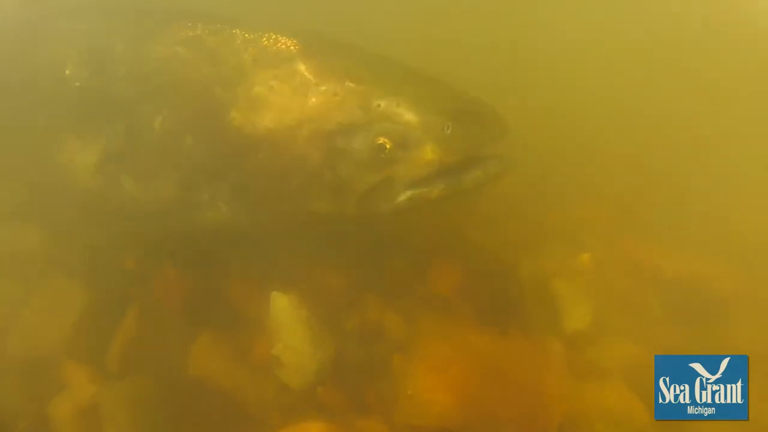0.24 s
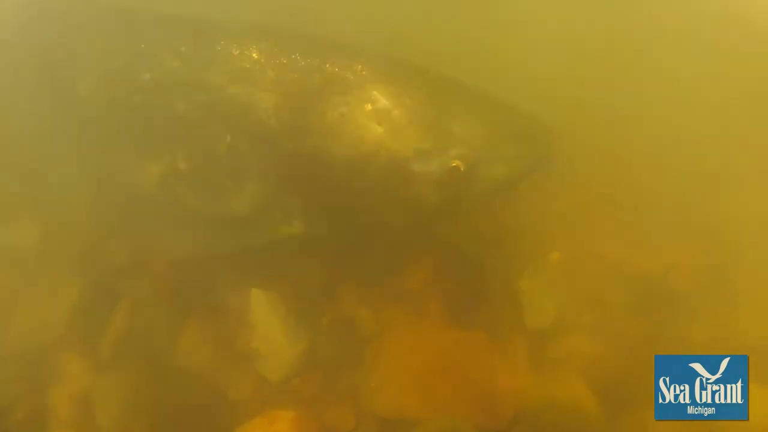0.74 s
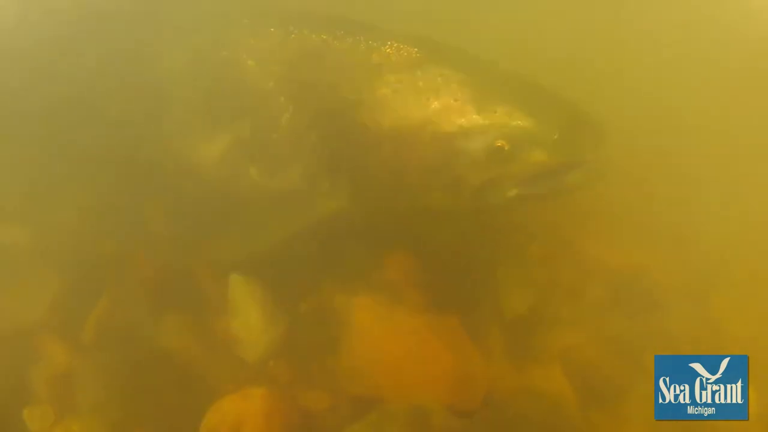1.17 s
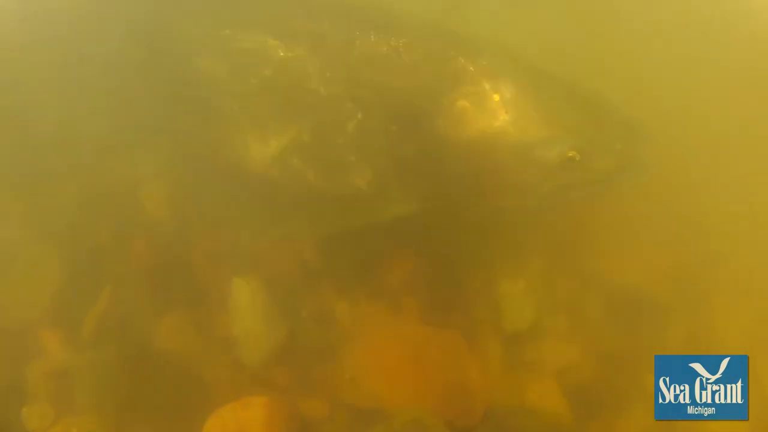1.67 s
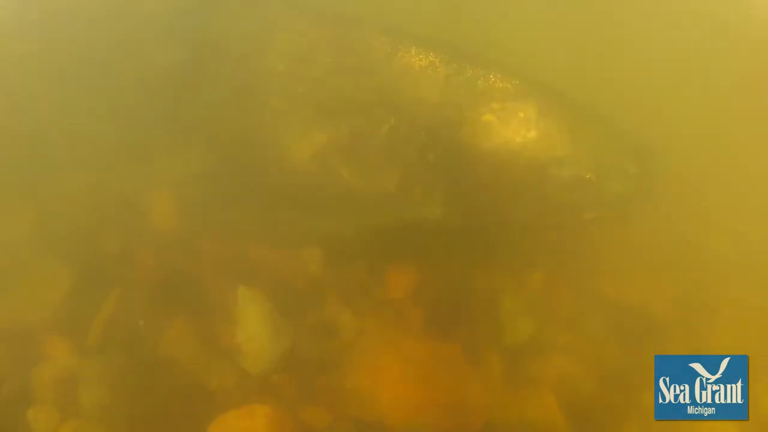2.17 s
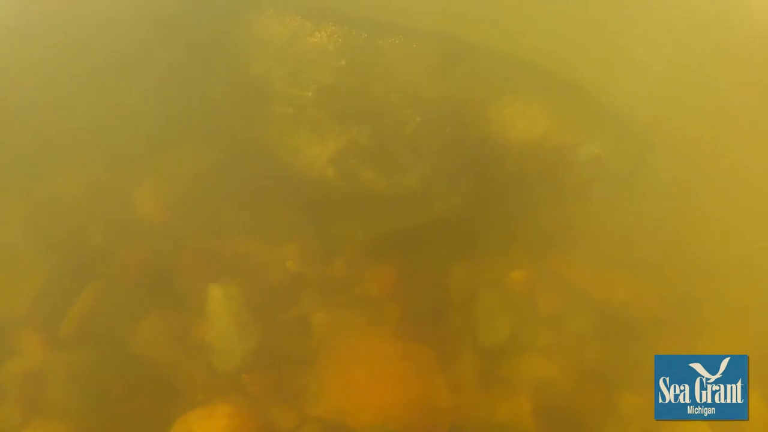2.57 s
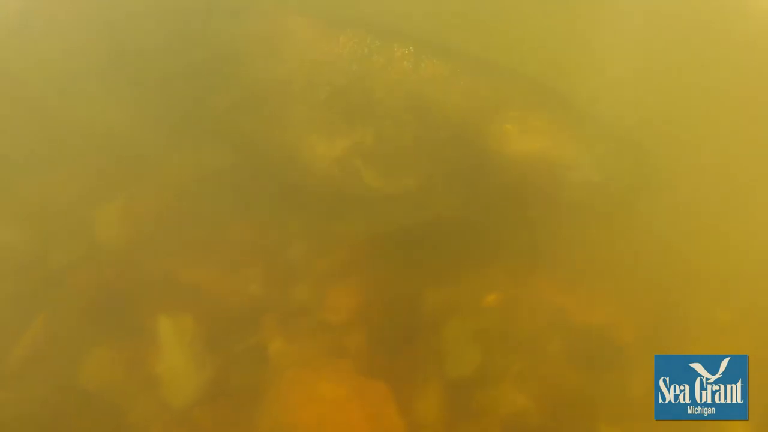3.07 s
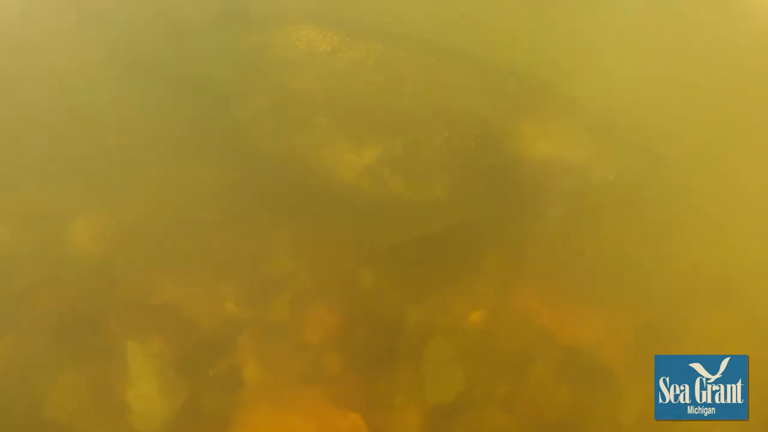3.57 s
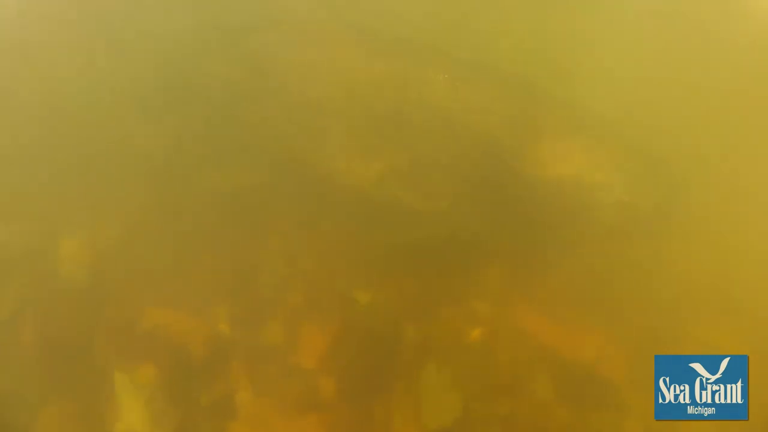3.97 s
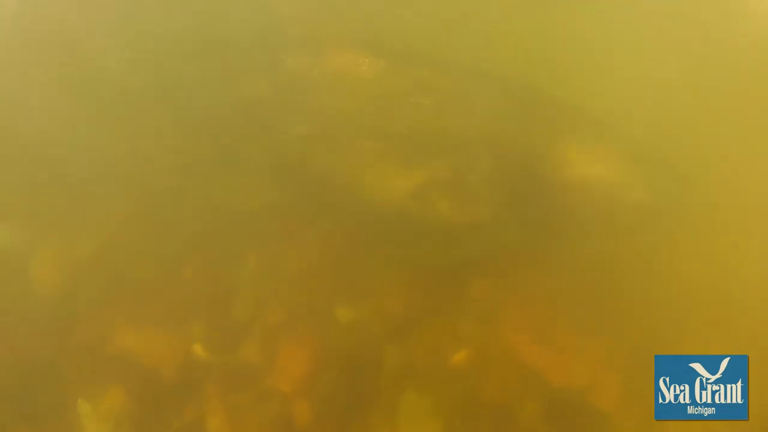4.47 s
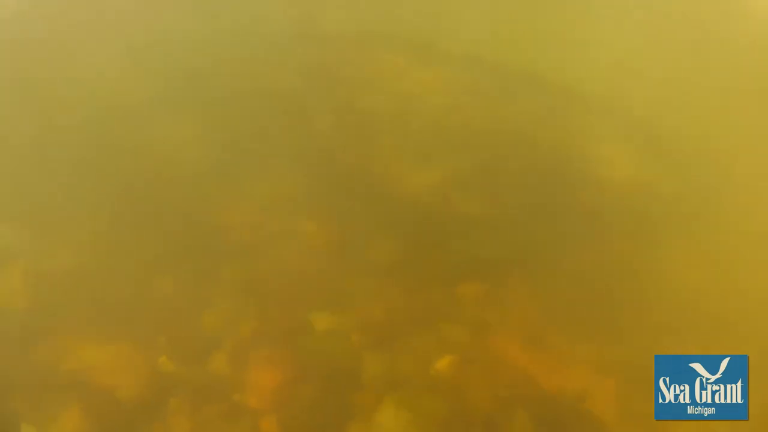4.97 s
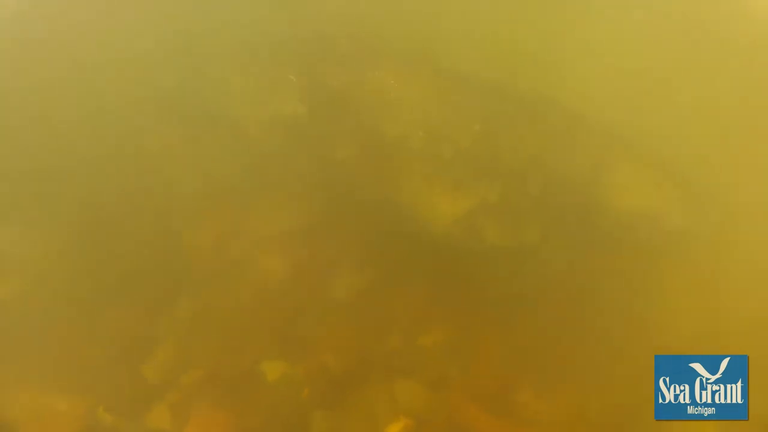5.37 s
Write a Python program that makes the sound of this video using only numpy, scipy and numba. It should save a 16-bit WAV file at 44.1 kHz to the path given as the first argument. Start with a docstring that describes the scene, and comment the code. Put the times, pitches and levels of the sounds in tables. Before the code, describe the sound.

A submerged microphone catches current buffeting its mount: deep rumbling, sandy scrapes, a hard thump midway, bubble blips, scraping thickest at the end.

```python
"""Low, restless rumble under gritty scraping, with knocks, watery pings and gulps: a sealed camera on a pole in a river.
The current drives noise through the low modes of the pole; scattered grains ring the shell and the lens port.
Knocks and the soft thumps of eddies are short pushes on these modes, bubbles are gliding, fading sines, the far river
is banded noise. The recorder samples slowly and holds each value, so the treble mirrors the middle."""
import sys
import numpy as np
from scipy import signal
from scipy.fft import rfft, irfft
from scipy.io import wavfile
from scipy.ndimage import uniform_filter1d
from numba import njit

SR = 44100
rng = np.random.default_rng(int(sys.argv[2]) if len(sys.argv) > 2 else 0)


def volts_from_decibels(level):
    """Turn decibel levels (scalar or array-like) into linear amplitude factors."""
    exponent = np.asarray(level, float) / 20
    return 10 ** exponent


def to_wav(sig):
    """Store sig (one row per channel, or 1-D mono) as 16-bit WAV at the path in sys.argv[1].

    Samples outside -1..1 are clipped; the rate is SR.
    """
    pcm = np.clip(np.atleast_2d(sig), -1, 1) * 32767
    pcm = np.round(pcm).astype(np.int16)
    wavfile.write(sys.argv[1], SR, pcm.T)  # frames by channels


N = 248724
TIME = np.arange(N) / SR

# Modes of the pole and its mount. Each row: pitch in Hz, width in Hz when driven steadily, relative level in dB.
POLE_MODES = [(26.2, 13.5, -3.5), (40.16, 10.6, 1), (61.3, 16, -10), (92, 11, -4.5), (141.7, 15.5, -14),
              (184, 12, -16.5), (245, 17.7, -15), (281, 45, -21.5)]


def level(x, db):
    """Scale to an rms level in dB."""
    return x * volts_from_decibels(db) / np.sqrt(np.mean(x ** 2))


def curve(table):
    """Draw a line through rows of (seconds, value), sample by sample."""
    seconds, values = np.transpose(table)
    return np.interp(TIME, seconds, values)


def walk(rate):
    """Random levels held 1 / rate s and slewed twice; spread near 1."""
    hold = int(SR / rate)
    steps = np.repeat(rng.standard_normal(N // hold + 1), hold)
    return 1.3 * uniform_filter1d(uniform_filter1d(steps, hold), hold)[:N]


@njit
def resonance(x, hz, width):
    """State-variable bandpass: its centre is given per sample, gain 1 at the centre."""
    out, band, low = np.empty(len(x)), 0., 0.
    for i in range(len(x)):
        g, damping = np.tan(np.pi * hz[i] / SR), width / hz[i]
        v = (band + g * (x[i] - low)) / (1 + g * (g + damping))
        band, low = 2 * v - band, low + 2 * g * v
        out[i] = damping * v
    return out


def ring(x, modes, patchy_db):
    """Drive a set of modes; neighbours swing in opposite senses, each caught now more, now less."""
    out = np.zeros(N)
    for k, (hz, width, db) in enumerate(modes):
        drive = volts_from_decibels(patchy_db * walk(18)) * x
        out += (-1) ** k * volts_from_decibels(db) * resonance(drive, np.full(N, 1. * hz), 1. * width)
    return out


def grit(rate, spread_db):
    """Scattered contacts at a rate per second, of either sign, most near full size and a few much larger."""
    when, sign, size = rng.random((N, 3)).T
    return (when < rate / SR) * np.sign(sign - .5) * volts_from_decibels(-spread_db * np.log(1 - size))


def blows(db_column, modes, damping, contact_s=0.0017):
    """Each knock or thump is a short push; bending waves carry it to the microphone, the low ones slowest."""
    # Knocks on the housing, and soft low thumps as eddies shove the pole. Each row: start in seconds, then peak
    # levels in dB of the rap on the shell, the sway of the pole, its first bend and the ring of the mount.
    knocks = [(.004, -63, -27.5, -37, -43.5), (0.164, -62, -36.5, -54, -62), (.298, -46, -54, -40, -42.5),
              (0.445, -56, -31, -37, -43), (0.816, -58, -30.5, -48, -60), (1.108, -46, -40, -47, -54),
              (1.04, -58, -58, -50, -44.5), (1.24, -60, -53, -46.5, -44.5), (1.775, -45, -53, -38.5, -62),
              (1.877, -43, -71, -35.5, -55), (1.93, -62, -55, -40.5, -59), (2.181, -52, -48, -43.5, -49.5),
              (2.224, -60, -52, -43, -58), (2.475, -60, -53, -51, -62), (2.514, -27, -22.5, -30, -24.5),
              (2.788, -42.5, -34.5, -40, -46), (2.955, -60, -40.5, -49, -56), (3.029, -58, -51, -52, -57),
              (3.125, -55, -35.5, -49, -58), (3.624, -55, -37, -59, -62), (4.14, -56, -34, -49, -63),
              (4.261, -60, -38, -58, -60), (4.665, -37, -49, -33, -45), (4.968, -36.5, -50, -30.5, -32),
              (4.982, -42, -22.5, -30, -36.5), (5.154, -58, -33.5, -55, -64),
              (5.273, -42, -49, -48.5, -38.5)]
    out, t = np.zeros(N + SR), TIME[:SR // 2]
    answer = 0
    for hz, width, db in modes:
        late = np.maximum(t - 0.056 / np.sqrt(hz) + 0.0014, 0)
        fade = np.exp(-np.pi * damping * width * late)
        answer = answer + volts_from_decibels(db) * fade * np.sin(2 * np.pi * hz * late)
    push = np.hanning(int(max(contact_s, 2e-4) * SR) + 2)
    sound = np.convolve(answer, push)
    sound = sound / np.max(np.abs(sound))
    for row in knocks:
        out[int(row[0] * SR):][:len(sound)] += volts_from_decibels(row[db_column]) * sound
    return out[:N]


def pole():
    """Eddies shake the pole without pause; pushed, each mode rings more purely than the eddies let it."""
    # Strength of the current. Each row: time in seconds, sway of the pole in dB.
    current = [(0.0, -40.5), (0.3, -43.5), (0.74, -44), (0.96, -42), (1.33, -44), (1.84, -43.5),
               (2.21, -47), (2.97, -44), (3.71, -47.5), (3.96, -45), (4.15, -42), (4.59, -45.5),
               (4.95, -39.5), (5.4, -43), (5.56, -41), (5.64, -42)]
    eddy_db, surge_db, upper_db = 2, 2.5, -7  # spread of eddies and surges; upper modes against the sway
    sway = level(ring(rng.standard_normal(N), POLE_MODES[:3], eddy_db), 0)
    surges = volts_from_decibels(surge_db * walk(6)) * rng.standard_normal(N)
    upper = level(ring(surges, POLE_MODES[3:6], 1.5), upper_db)
    pushed_sway = blows(2, POLE_MODES[1:3], 0.63)
    pushed_bend = blows(3, POLE_MODES[3:4], 0.59)
    pushed_mount = blows(4, (POLE_MODES[4], *POLE_MODES[6:]), 0.57)
    return volts_from_decibels(curve(current)) * (sway + upper) + pushed_sway + pushed_bend + pushed_mount


def scraping():
    """Level in dB of all drags together: each swells, holds and dies away."""
    # Grit pressed against the housing. Each row: start in seconds, swell in seconds, hold in seconds,
    # scraping level in dB.
    drags = [(0, .001, .004, -47), (0, .001, 0.31, -62), (0.245, 0.042, 0.0091, -46),
             (0.318, .03, 0.096, -52.5), (0.398, 0.041, .008, -46), (0.474, 0.016, 0.61, -56.5),
             (0.606, 0.091, 0.032, -53), (0.813, 0.019, 0.0095, -56.5), (0.875, 0.036, .03, -55),
             (0.99, .015, .04, -65), (1.099, .004, 0.083, -53), (1.379, .004, 0.014, -60),
             (1.53, .045, .05, -70), (1.769, 0.0062, 0.011, -52), (1.83, 0.058, 0.022, -56),
             (2.146, 0.026, 0.085, -60), (2.39, .02, .04, -76), (2.475, .005, 0.054, -54.5),
             (2.504, .002, 0.051, -50.5), (2.64, .06, 0.041, -73), (2.777, .012, 0.0044, -52.5),
             (2.87, 0.084, 0.73, -55), (2.96, 0.072, 0.13, -53.5), (3.217, 0.056, 0.024, -51),
             (3.474, .13, 0.097, -53), (3.656, 0.074, 0.28, -56.5), (3.92, 0.088, 0.083, -54),
             (4.092, 0.055, 0.22, -56), (4.16, 0.041, .015, -58), (4.278, 0.14, 0.12, -48.5),
             (4.507, 0.062, 0.057, -54.5), (4.657, 0.0067, 0.018, -46), (4.715, 0.014, 0.32, -49),
             (4.957, .01, 0.027, -45.5), (5.047, 0.027, 0.15, -48.5), (5.15, 0.13, 0.038, -44.5),
             (5.327, 0.021, 0.0091, -43.5), (5.365, .01, 0.037, -48.5), (5.438, 0.012, 0.015, -50.5),
             (5.457, 0.035, .2, -46)]
    let_go_db_per_s = 354
    power = volts_from_decibels(-85) ** 2  # the trickle of grit that never stops
    for start, swell, hold, db in drags:
        rise = np.clip((TIME - start) / max(swell, 1e-3), 0, 1)
        since_hold = np.clip(TIME - start - swell - hold, 0, 1)
        power = power + (rise * volts_from_decibels(db - let_go_db_per_s * since_hold)) ** 2
    return 10 * np.log10(power)


def housing():
    """Grit drags unevenly over shell and lens port; the place of contact decides which modes speak."""
    # Modes of the shell. Each row: pitch in Hz, width in Hz, relative level in dB when rubbed underneath,
    # relative level in dB when rubbed on the flank.
    shell_modes = [(360.6, 47, 1.5, -16), (485, 42, 3, -5), (550, 50.7, 0.5, -5), (614, 44.6, 0.5, 1.5),
                   (671, 23.3, 1, -1.5), (734, 26, -28.5, -7), (894, 44, -16, -5), (1058, 78, -19, -13),
                   (1191, 52, -12, -13), (1319.6, 45.6, -10.5, -4.5), (1508, 130, -16.5, -16),
                   (1720, 135, -20.5, -21)]
    # Modes of the lens port. Each row: pitch in Hz, width in Hz, relative level in dB.
    lens_modes = [(2140, 190, 8.5), (2450, 150, 7), (2680, 154, 7), (3070, 65, 9), (3450, 340, 1),
                  (4970, 52, -18)]
    # Where the grit drags. Each row: time in seconds, place from 0 (underside) to 1 (flank).
    place = [(0, 0.36), (2.8, 0.058), (2.95, 0.96), (5.64, 1)]
    # A puff of sand strikes the port: centre in seconds, spread in seconds, peak level in dB.
    sand_puff = (.07, 0.035, -68.5)
    scrape_db = scraping()
    flank = np.clip(curve(place), 0, 1)
    pressure = volts_from_decibels(1.58 * walk(24.9))
    # grains are round, so dull above 2500 Hz
    dull = signal.butter(2, 2500, fs=SR, output="sos")
    drag = pressure * level(signal.sosfilt(dull, grit(7000, 2.06)), 0)
    underside = [(hz, width, under_db) for hz, width, under_db, _ in shell_modes]
    side = [(hz, width, flank_db) for hz, width, _, flank_db in shell_modes]
    shell = ring(np.sqrt(1 - flank) * drag, underside, 3.5) + ring(np.sqrt(flank) * drag, side, 1.0)
    # the drags also reach the upper modes of the pole
    mount = level(ring(drag, POLE_MODES[3:], 4.5), -0.11)

    # the finest sand is too dense to hear grain by grain
    sand = resonance(pressure ** 0.36 * rng.standard_normal(N), np.full(N, 2700.), 4600.0)
    # it follows the scraping averaged over 0.14 s: -75.5 dB at -56 dB of scraping, 0.85 dB per dB
    smooth_db = uniform_filter1d(scrape_db, int(0.14 * SR) + 1)
    cloud = volts_from_decibels(-75.5 + 0.85 * (smooth_db + 56))
    centre, spread, puff_db = sand_puff
    puff = volts_from_decibels(puff_db) * np.exp(-((TIME - centre) / spread) ** 2)
    lens = (cloud + puff) * level(ring(sand, lens_modes, 2.5), 0)

    # the shell is stiffer than the pole, so the push on it is briefer
    raps = blows(1, underside, 1.4, contact_s=.0007)
    return volts_from_decibels(scrape_db) * (level(shell, 0) + mount) + lens + raps


def squeak():
    """A grain sticks and slips on the lens port: a wavering sine that swells, then drops away faster."""
    # One squeak: start in seconds, end in seconds, pitch in Hz, peak level in dB.
    grain_squeak = (5.31, 5.365, 3150, -59)
    start, end, hz, db = grain_squeak
    share = np.clip((TIME - start) / (end - start), 0, 1)
    swell = np.sin(np.pi * share ** 2)
    return volts_from_decibels(db) * swell * np.sin(2 * np.pi * hz * TIME + 0.81 * walk(88))


def bubbles():
    """Each bubble is a fading sine that glides; low ones gulp, high ones ping, fainter ones come at random."""
    # Bubbles close by. Each row: start in seconds, level in dB ahead of swell and fade, starting pitch in Hz,
    # glide in shares of that pitch per second.
    near_bubbles = [(.0465, -48, 1530, 1.5), (.047, -50, 1980, 2), (.058, -64, 3070, -1),
                    (.073, -53, 2450, -10), (.099, -56, 1660, 10), (.135, -54.5, 3640, -4),
                    (.185, -42.5, 2500, -13.5), (.1855, -58, 5700, 5), (.2034, -60, 2110, -5),
                    (.277, -32, 556, 0.5), (.296, -37, 626, 4), (.448, -28.5, 582, 3.5),
                    (.4888, -55, 2330, 0), (.5456, -56, 2440, 1.5), (.772, -67, 2510, -5),
                    (.871, -60, 2530, 6), (1.1044, -63, 2130, -3), (1.108, -39.5, 602, 8.5),
                    (1.4381, -60, 2300, 1.5), (1.96, -65, 2500, 0), (1.998, -61.5, 2550, 0),
                    (2.045, -66, 2350, -3), (2.3032, -58.5, 2420, 0), (2.375, -54, 2240, -2),
                    (2.4578, -62, 2020, 2), (2.6309, -56, 1940, -1), (2.7407, -64, 2250, 4)]
    chance = rng.random((24, 3))
    faint = [(a * N / SR, -70 + 6 * b, 1900 + 800 * c, 1.5) for a, b, c in chance]
    out, t = np.zeros(N + SR), TIME[:SR // 8]
    for start, db, hz, glide in list(near_bubbles) + faint:
        # larger, lower bubbles ring longer: 60 dB down in 0.05 s at 1 kHz
        t60 = .05 * (1000 / hz) ** 0.36
        fade = np.exp(-np.log(1000) * t / t60)
        swell = 1 - np.exp(-(t * hz / 0.96) ** 2)  # within a cycle or two
        tone = np.sin(2 * np.pi * hz * (t + glide * t ** 2 / 2))
        out[int(start * SR):][:len(t)] += volts_from_decibels(db) * fade * swell * tone
    return out[:N]


def wash():
    """The far rush of the river and the microphone's own hiss: noise in half-octave bands that flicker a little."""
    # Spectrum of the rush. Each row: frequency in Hz, relative density in dB per Hz.
    rush_spectrum = [(88, -28), (150, 3.5), (327, -8), (622, -26.5), (782, -34), (1300, -39), (1730, -24.5),
                     (4080, -26.5), (5800, -21.5), (7540, -66), (12800, -120)]
    hz, db = np.transpose(rush_spectrum)
    bands = 150 * 2 ** np.arange(0, 5.4, .5)
    gains = np.interp(np.log(bands), np.log(hz), db) + 10 * np.log10(bands)
    flicker_db = .4
    rush = np.zeros(N)
    for f, gain in zip(bands, gains):
        centre = np.full(N, f)
        noise = resonance(resonance(rng.standard_normal(N), centre, f / 2), centre, f / 2)
        rush += volts_from_decibels(gain + flicker_db * walk(13)) * noise / np.sqrt(f)  # wider bands pass more noise
    return level(rush, -63.5)


def scene():
    """Everything reaches one microphone through the housing."""
    return (pole() + housing() + squeak() + bubbles() + wash())[None]


def roll_off(x):
    """The treble ends steeply here."""
    return signal.sosfilt(signal.butter(12, 11050, fs=SR, output="sos"), x)


def record(dry):
    """Slow sampling mirrors the band about half the rate; holding each value tilts the mirror image down."""
    hold_hz, top_hz = 12000, 10900
    hz = np.fft.rfftfreq(N, 1 / SR)
    treble_cut = 1 + (hz / 5800) ** 14
    bass_cut = 1 + (17 / (hz + 1)) ** 6
    band = irfft(rfft(dry) / treble_cut / bass_cut, N)
    sampled = band * (1 + 2 * np.cos(2 * np.pi * hold_hz * TIME))
    # the treble comes out a little lifted
    lift = volts_from_decibels(3.8 * np.exp(-((hz - 8000) / 3000) ** 2))
    held = irfft(rfft(sampled) * np.sinc(hz / hold_hz) * lift * (hz < top_hz), N)
    return roll_off(held)


dry = scene()
out = record(dry)
to_wav(out)
```